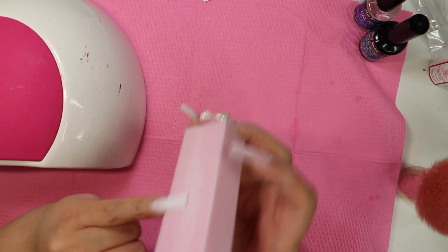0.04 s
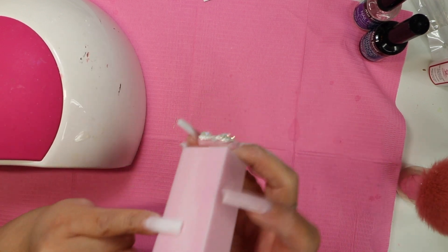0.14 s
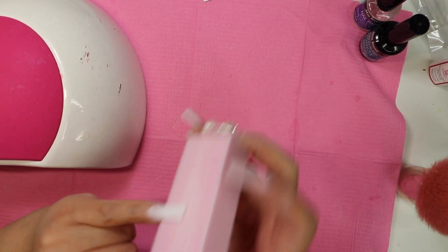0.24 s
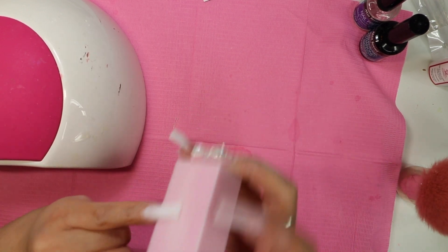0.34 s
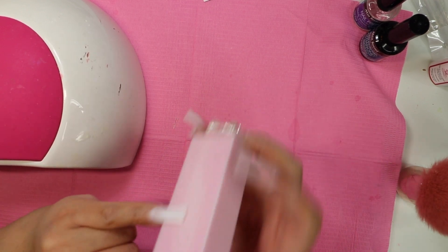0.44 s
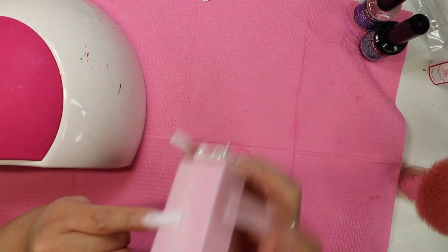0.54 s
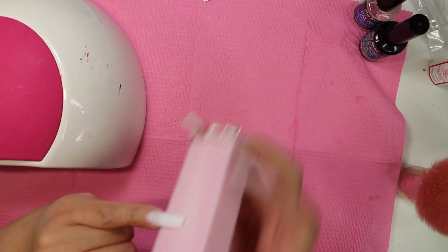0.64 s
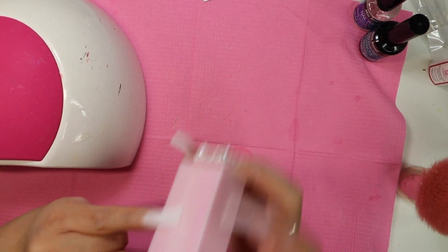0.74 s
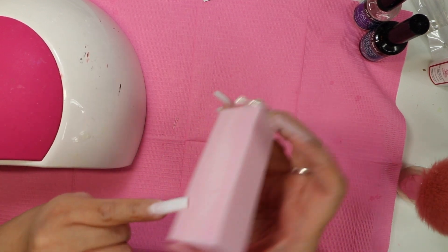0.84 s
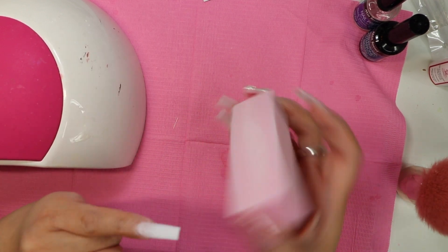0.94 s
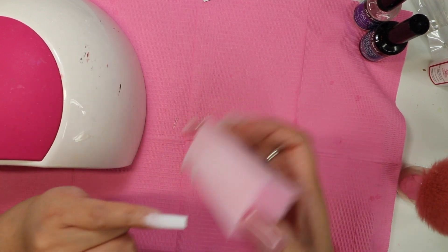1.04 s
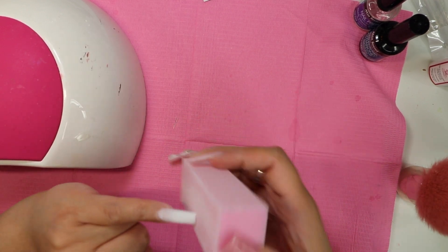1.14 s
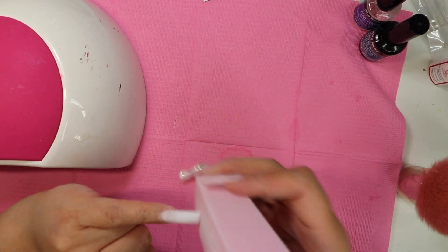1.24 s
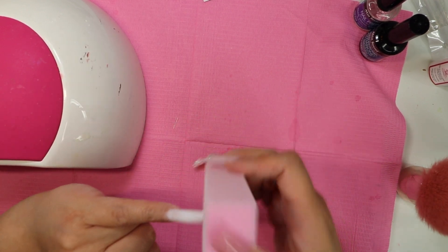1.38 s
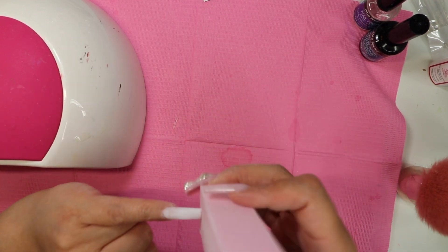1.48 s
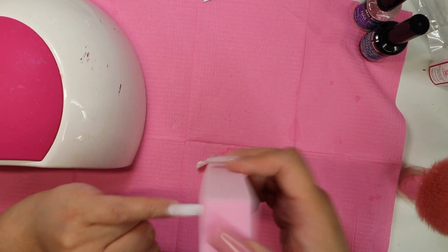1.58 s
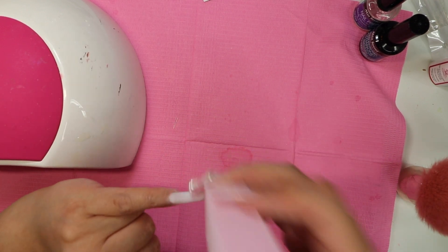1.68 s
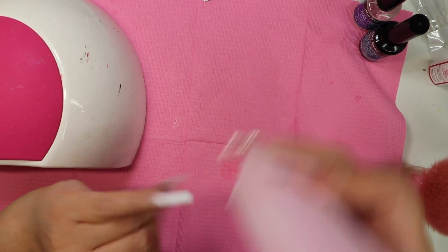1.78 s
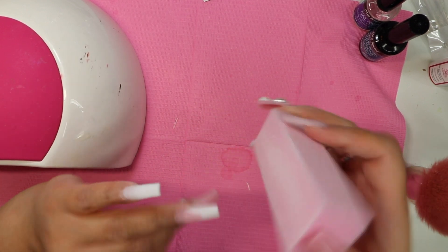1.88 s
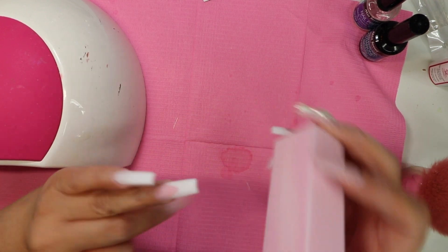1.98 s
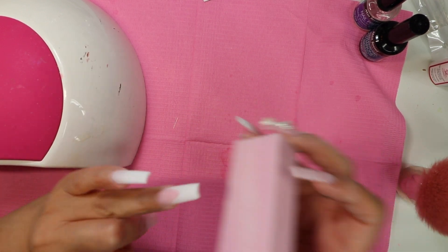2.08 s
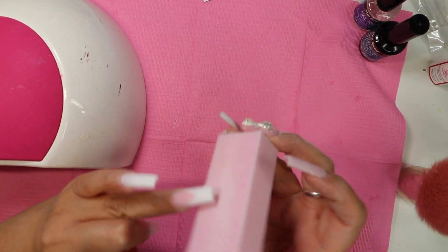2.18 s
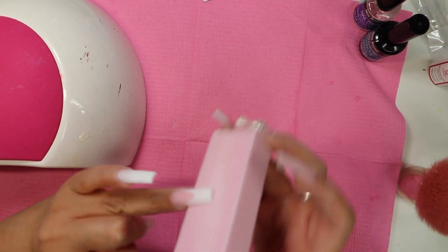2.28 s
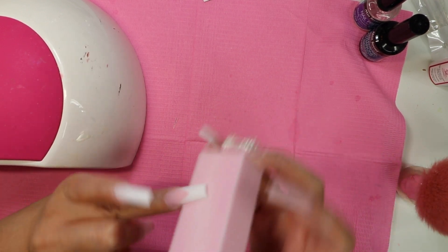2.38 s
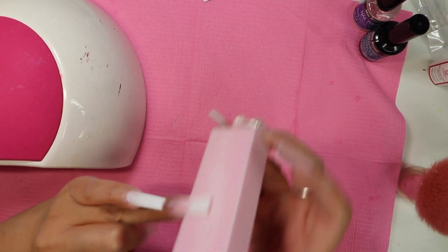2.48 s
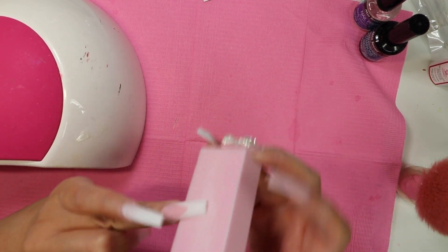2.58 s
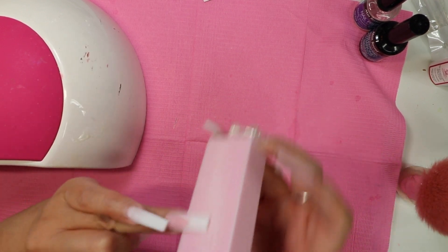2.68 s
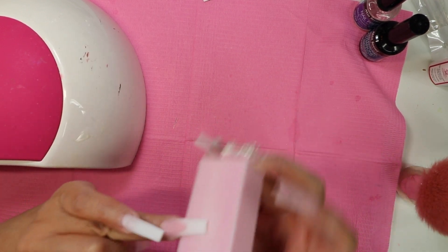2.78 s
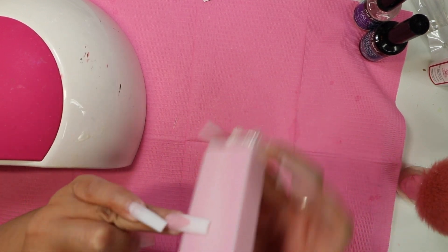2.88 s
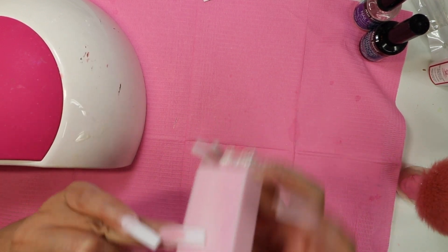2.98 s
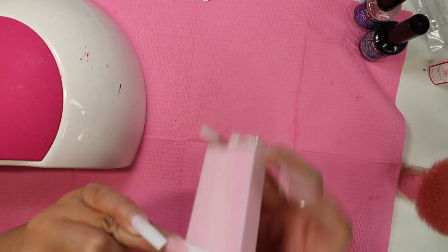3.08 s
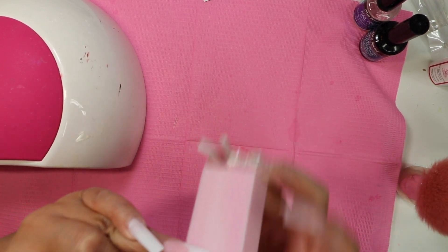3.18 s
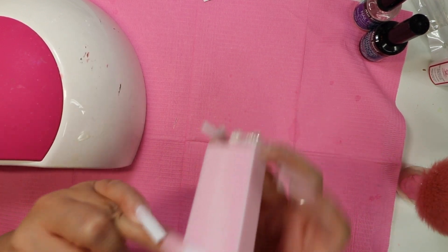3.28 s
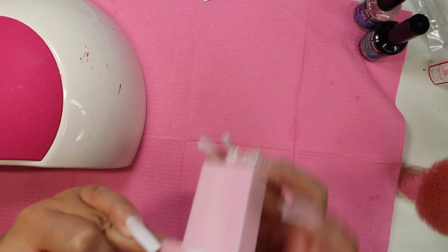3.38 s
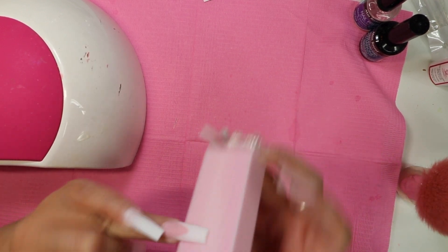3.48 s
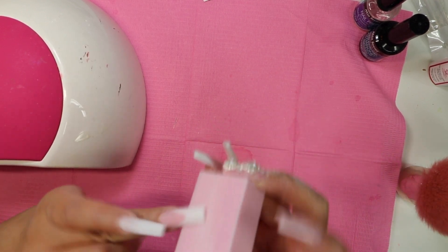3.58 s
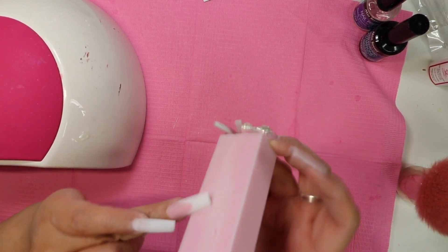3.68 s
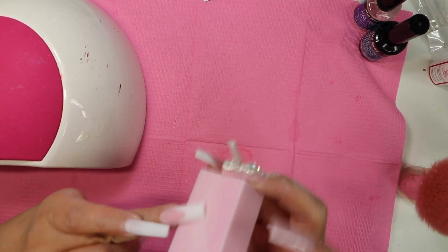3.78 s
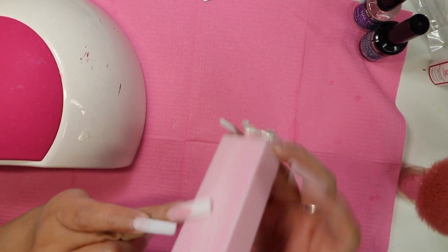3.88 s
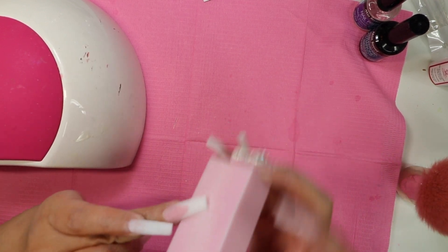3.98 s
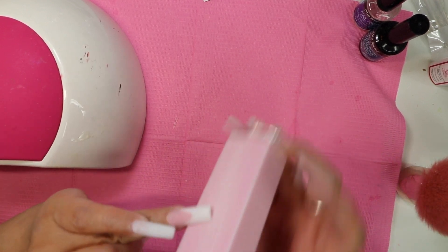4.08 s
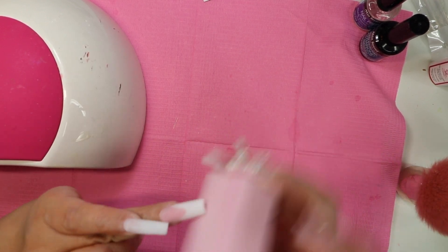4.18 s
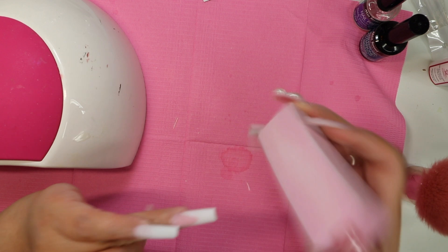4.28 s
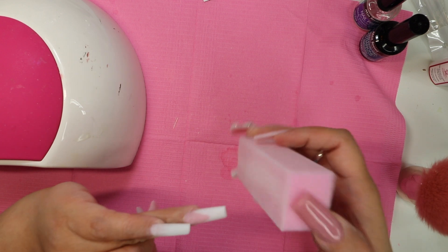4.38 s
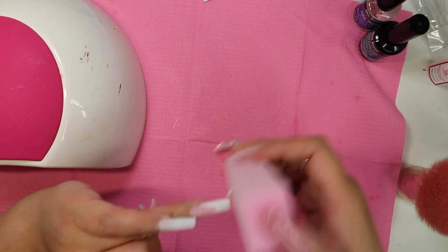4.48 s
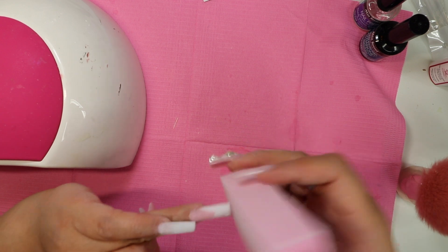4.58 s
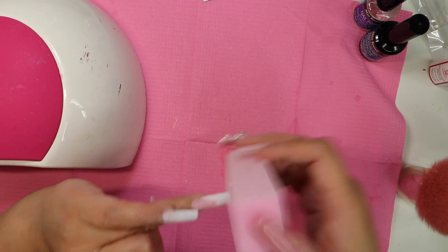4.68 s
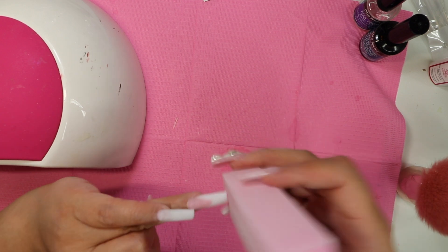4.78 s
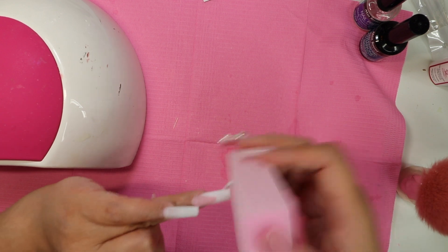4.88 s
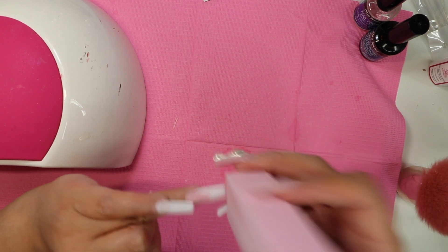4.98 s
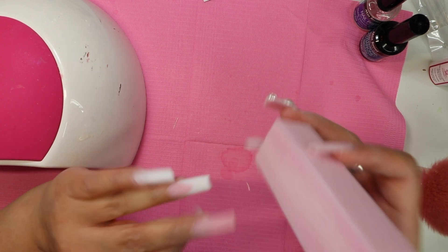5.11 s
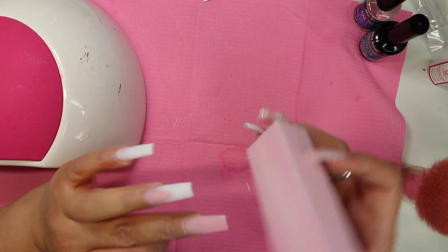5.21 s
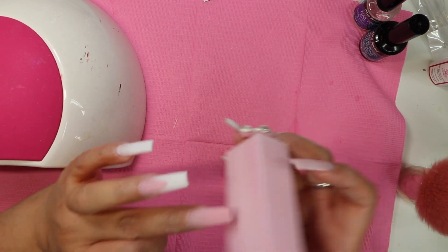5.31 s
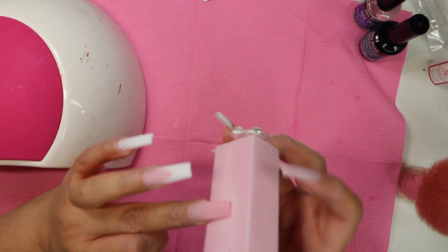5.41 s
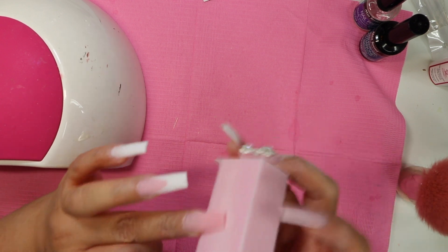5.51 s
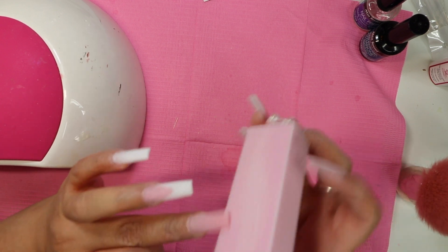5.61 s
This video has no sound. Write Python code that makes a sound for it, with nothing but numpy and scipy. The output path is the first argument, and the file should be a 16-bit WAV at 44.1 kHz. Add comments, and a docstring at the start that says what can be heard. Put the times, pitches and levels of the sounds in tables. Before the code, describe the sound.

A foam buffer block rubs back and forth over long hard fingernails in quick, gritty strokes, the nail tip clicking against it now and then. The rubbing slows to a few separate scrubs, pauses briefly, then runs quick and even again. More spaced scrubs and one last stroke follow, with light finger rustles and soft table bumps. The microphone is close, in a small room with a faint hush.

```python
"""A foam buffer block rubs long hard nails, close under a phone in a small room with a hush and faint hum.
From the start, grit catches and slips thousands of times a second, ringing nail and block; the nail tip
knocks as strokes land, with a short echo. From 0.9 s, fingers rustle and the hand jolts the table at times.
The block moves from the first nail's face to a free edge (1.1 s), to a second nail's face (1.85 s),
to an edge again (4.5 s), and ends back on the first nail's face (5.2 s)."""
import sys
import numpy as np
from scipy import signal
from scipy.fft import rfft, irfft, next_fast_len
from scipy.io import wavfile
from scipy.ndimage import uniform_filter1d

SR = 44100
rng = np.random.default_rng(int(sys.argv[2]) if len(sys.argv) > 2 else 0)


def waveform_to_disk(signal):
    """Save audio, clipped to [-1, 1], as 16-bit WAV at the path in sys.argv[1]."""
    frames = np.transpose(np.atleast_2d(signal))
    scaled = np.clip(frames, -1, 1) * 32767
    samples = np.round(scaled).astype(np.int16)
    wavfile.write(sys.argv[1], SR, samples)


N = 249165


def undb(db):
    """Turn decibels (dB) into a factor to multiply by."""
    return 10 ** (np.asarray(db) / 20)


def unit(x):
    """Scale a signal to an average power of 1."""
    return x / np.sqrt(np.mean(x ** 2) + 1e-18)


def look_up(hz, table, column=1):
    """Read between the rows of a frequency table, with octaves evenly spaced."""
    table = np.array(table)
    return np.interp(np.log(hz + 1), np.log(table[:, 0]), table[:, column])


def wander(size, rate_hz):
    """A curve that glides to a new random value rate_hz times a second."""
    step = max(int(SR / rate_hz), 2)
    held = np.repeat(rng.standard_normal(size // step + 1), step)
    return 0.94 * uniform_filter1d(held, step)[:size]


# Each row: frequency in Hz, how alike left and right are (1 = the same) for near sound, for room sound.
LIKENESS = [(60, 0.84, 0.85), (150, 0.55, 0.39), (300, 0.96, 0.48), (690, 0.95, 0.6), (1410, 0.84, 0.15),
            (2980, 0.41, 0.03), (7000, 0.32, .05), (15000, 0.34, .05)]
# Each row: frequency in Hz, how far the left wave runs ahead of the right in radians.
LEFT_LEAD = [(300, 0.13), (2200, 0.044), (3600, 0.012), (5100, 0.74), (8500, 0.61), (11000, 1.34),
             (15000, 0.81)]

def stereo(noises, hz, diffuse=False):
    """Two noises become left and right spectra: in the treble the microphones differ more."""
    mid, side = rfft(noises)
    alike = look_up(hz, LIKENESS, 2 if diffuse else 1)
    lead = np.exp(.5j * look_up(hz, LEFT_LEAD))
    mid, side = np.sqrt((1 + alike) / 2) * mid, np.sqrt((1 - alike) / 2) * side
    return np.array([(mid + side) * lead, (mid - side) / lead])


# Each row: frequency in Hz, relative strength of the hush there in dB.
HUSH_SHAPE = [(15, -40.5), (25, 1.5), (185, -9), (344, -6.5), (677, -15.5), (1400, -16), (1560, -16),
              (2220, -15), (2910, -24.5), (4740, -26), (10700, -23), (16000, -33.5)]

def hush(level_db=-52, swell_db=1.2):
    """The steady hush of the room, swelling a little."""
    hz = np.arange(N // 2 + 1) * SR / N
    spectrum = stereo(rng.standard_normal((2, N)), hz, diffuse=True)
    noise = irfft(spectrum * undb(look_up(hz, HUSH_SHAPE)), N)
    return unit(noise) * undb(level_db + swell_db * wander(N, rate_hz=4.81))


# Each row: time in seconds, level of the hum in dB.
HUM_LEVELS = [(0, -58.5), (1.1, -68), (1.3, -55.5), (1.84, -54.5), (2.0, -81), (2.4, -64.5), (4.0, -59),
              (4.46, -55), (4.75, -78), (5.2, -77), (5.65, -70)]

def hum(pitch_hz=323, width_hz=33):
    """A faint hum comes and goes: a narrow band of noise, nearly a wavering tone."""
    hz = np.arange(N // 2 + 1) * SR / N
    spectrum = stereo(rng.standard_normal((2, N)), hz)
    band = irfft(spectrum * np.exp(-((hz - pitch_hz) / width_hz) ** 2), N)
    return unit(band) * undb(np.interp(np.arange(N) / SR, *np.transpose(HUM_LEVELS)))


# Each row: start and end in seconds of a spell on a nail's free edge, its overhanging tip.
EDGE_SPELLS = [(1.1, 1.8), (4.5, 5.2)]
FIRST_FACE, EDGE, SECOND_FACE = 0, 1, 2

def place_at(seconds):
    """Where the block is rubbing at this moment."""
    if any(start < seconds < end for start, end in EDGE_SPELLS):
        return EDGE
    return SECOND_FACE if 1.85 < seconds < 4.4 else FIRST_FACE


def resonance(hz, modes, tunings):
    """How strongly and how late a thing answers each frequency. Modes are the pitches it rings at."""
    total = 0
    for k, ((pitch, width, db), tuning) in enumerate(zip(modes, tunings)):
        damping = 1j * hz * width
        total = total + (-1) ** k * undb(db) * damping / ((pitch * tuning) ** 2 - hz ** 2 + damping)
    return unit(np.abs(total)) * np.exp(1j * np.angle(total))


# The nail's ring, the foam's thud and the grit's hiss. Each row: pitch in Hz, width in Hz,
# then relative level in dB on the first nail's face, on a free edge, on the second nail's face.
NAIL_MODES = [(1058, 620, -1.5, -39, -7.5), (1264, 290, 4, -8, -1.5), (1820, 222, 5, 0, 0),
              (2327, 206, 5, -1, 1), (2714, 214, 5.5, -0.5, 1.5), (3370, 590, 5, -2, 0),
              (4260, 570, -1.5, -8.5, -3)]
BLOCK_MODES = [(196, 63, -8, -9.5, -14), (334, 95, -3, -5, -3), (509, 175, 3.5, 2, 1.5),
               (823, 300, -0.5, -4, -4)]
GRIT_BANDS = [(5400, 2050, 0.5, -3, -3), (7320, 2090, 4, 2, 1.5), (8800, 2110, 3, 0, 2.5),
              (11270, 1980, -2, -6, -2.5), (13900, 3000, -10.5, -13, -11)]

def ring(forces, place, thud_db, hiss_db, pan_db, pitch_hz, boost_db, tunings):
    """Three forces ring nail, block and grit. Nail modes near pitch_hz are boosted."""
    size = forces.shape[-1]
    hz = np.arange(size // 2 + 1) * SR / size
    nail = [(f, width, db[place] + boost_db * np.exp(-(np.log(f / pitch_hz) / 0.16) ** 2))
            for f, width, *db in NAIL_MODES]
    block = [(f, width, db[place]) for f, width, *db in BLOCK_MODES]
    grit = [(f, width, db[place]) for f, width, *db in GRIT_BANDS]
    lean = np.array([[.5], [-.5]])  # a negative pan leans to the right
    responses = (resonance(hz, nail, tunings[:7]) * undb(pan_db * lean),
                 resonance(hz, block, tunings[7:11]) * undb(thud_db),
                 resonance(hz, grit, tunings[11:]) * undb(hiss_db + (pan_db + 2.0) * lean))
    return irfft(sum(stereo(force, hz) * response for force, response in zip(forces, responses)), size)


# An ordinary stroke on the first face, a free edge and the second face.
# Each row: thud in dB and hiss in dB against the nail's ring, pan (left minus right) in dB.
BALANCE = [(-11, -4, -1.4), (-13.5, -8, -3.5), (-12.5, -3, -2)]
# Each row: start in seconds, rise in ms, rubbing time in ms, level in dB as the block bites,
# level in dB mid-stroke, favoured pitch in Hz.
STROKES = [(0.005, 26, 14.5, -21.5, -24.5, 2010), (0.111, 3, 15, -31, -37.5, 3310),
           (0.139, 3, 20, -36, -31, 2990), (0.19, 1, 126, -45.5, -52, 3130),
           (0.273, 13.4, 60.7, -26.5, -22.5, 1800), (0.394, 3.9, 41.7, -20, -20.5, 3080),
           (0.483, 0.87, 51.5, -24.5, -21.5, 1880), (0.579, 12, 39.6, -24, -23, 2800),
           (0.664, 9.7, 56.3, -21, -22.5, 1860), (0.786, 12.6, 109, -18.5, -22, 2010),
           (0.993, 23, 62, -41.5, -49.5, 2280), (1.127, 1.7, 32, -41.5, -48, 1440),
           (1.201, 2.4, 88.4, -21, -22, 2280), (1.425, 8.6, 84.7, -19.5, -21.5, 2340),
           (1.649, 1.6, 34, -26, -24, 2430), (1.893, 11, 27, -47, -51.5, 1860),
           (1.976, 6.2, 117, -50, -46, 1870), (2.308, 9.1, 50.6, -26, -28.5, 1840),
           (2.404, 7.4, 50, -25, -22, 3500), (2.525, 1.4, 55, -26.5, -31, 1930),
           (2.614, 8.4, 46, -28.5, -28, 1630), (2.714, 5.2, 51.6, -23.5, -30.5, 1730),
           (2.81, 1.9, 47, -32.5, -27.5, 2100), (2.892, 6.8, 60, -21.5, -24.5, 1940),
           (2.992, 21, 44.5, -23.5, -23, 2860), (3.094, 11.3, 53, -20, -22.5, 2070),
           (3.208, 6.8, 39, -24, -25, 1830), (3.344, 1.1, 17, -20.5, -26.5, 3700),
           (3.412, 6.4, 43, -28.5, -33, 2160), (3.482, 6.6, 98.4, -26.5, -26.5, 1990),
           (3.632, 5.5, 58, -27.5, -23.5, 2000), (3.724, 5.4, 55, -29, -27.5, 2000),
           (3.827, 9.5, 49.5, -27.5, -26, 2110), (3.922, 3.6, 52.5, -24, -30, 2000),
           (4.002, 21, 47, -26, -25.5, 2030), (4.102, 7.1, 74.4, -24.5, -27, 1960),
           (4.197, 7.5, 28.5, -30, -22.5, 1820), (4.266, 1, 52, -54, -41.5, 2420),
           (4.572, 2.3, 41.4, -24, -19.5, 2500), (4.761, 2.2, 52.7, -18, -18.5, 2820),
           (4.973, 1.24, 32.7, -14.5, -18.5, 3170), (5.15, 3.8, 21.7, -41, -31, 2900),
           (5.445, 9.4, 45, -52, -45, 1770), (5.553, 2.4, 68, -33, -24.5, 1860)]

def strokes(graze_ms=20, fall_ms=14.7, grain_db=3.6, chatter_db=2.6, surge_db=2.0, detune=.025):
    """Grit slips in countless uneven steps; the nail chatters, so the force comes in bursts."""
    size = 8192
    out = np.zeros((2, N + SR))
    all_tunings = 1 + detune * rng.standard_normal((len(STROKES), 16))
    for (start, rise_ms, rub_ms, bite_db, middle_db, pitch_hz), tunings in zip(STROKES, all_tunings):
        place = place_at(start)
        graze_db, chatter_hz = (bite_db - 30, 600) if place == EDGE else (bite_db - 20, 250)
        # Compared with an ordinary stroke (-26 dB, 48 ms), more pressure favours the nail's ring;
        # a longer stroke lays more foam on the nail: more thud, less hiss.
        pressure_db = max((bite_db + middle_db) / 2, -32.5) + 26
        extra_ms = rub_ms - 48
        thud_db, hiss_db, pan_db = BALANCE[place]
        thud_db += -0.69 * pressure_db + 0.047 * extra_ms
        hiss_db += -0.21 * pressure_db - 0.0176 * extra_ms
        # The block grazes the nail, bites, rubs, eases and lifts off.
        eased_db = middle_db - 4.5
        corners_ms = np.cumsum([0, graze_ms, rise_ms, rub_ms / 6, rub_ms / 3, rub_ms / 3, rub_ms / 6,
                                fall_ms, 5])
        corners_db = [graze_db - 8, graze_db, bite_db - 1.5, bite_db, middle_db,
                      eased_db, eased_db - 3, eased_db - 24, -120]
        level_db = np.interp(np.arange(size) * 1000 / SR, corners_ms, corners_db)
        grains = grain_db * np.minimum(rng.exponential(size=size), 4)
        chatter = chatter_db * wander(size, chatter_hz)
        slips = undb(grains + chatter + surge_db * wander(size, rate_hz=70))
        slips /= np.sqrt(uniform_filter1d(slips ** 2, 900))  # the hand's pressure evens out over 20 ms
        forces = unit(slips * rng.standard_normal((3, 2, size))) * undb(level_db)
        forces[2] *= undb(0.18 * (level_db - level_db.max()))  # slow contact is duller: less grit
        i = int(start * SR)
        out[:, i:i + size] += ring(forces, place, thud_db, hiss_db, pan_db, pitch_hz,
                                   boost_db=4.5, tunings=tunings)
    return out[:, int(graze_ms * SR / 1000):][:, :N]  # each graze comes just before its start time


# Each row: frequency in Hz, seconds the echo takes to fade by 60 dB, level in dB.
ECHO_BANDS = [(300, 0.47, -12.5), (980, 0.28, -8), (2500, 0.23, -13), (6000, 0.28, -11),
              (12000, 0.14, -10.5)]

def echo(near, onset_ms=4):
    """The room smears each sound into a short tail of fading noise, built octave by octave."""
    size = next_fast_len(N + SR)
    t = np.arange(SR) / SR
    hz = np.arange(SR // 2 + 1.)
    onset = 1 - np.exp(-t * 1000 / onset_ms)
    tail = 0
    for centre_hz in 180 * 2. ** np.arange(7):
        spectrum = stereo(rng.standard_normal((2, SR)), hz, diffuse=True)
        band = irfft(spectrum * np.exp(-(np.log2((hz + 1) / centre_hz) / 0.74) ** 2), SR)
        shape = onset * np.exp(-np.log(1000) * t / look_up(centre_hz, ECHO_BANDS))
        gain = undb(look_up(centre_hz, ECHO_BANDS, column=2))
        tail = tail + gain * band * shape / np.sqrt(np.sum(shape ** 2))
    return irfft(rfft(tail, size) * rfft(near.mean(axis=0), size), size)[:, :N]


# Each row: start in seconds, peak level in dB, favoured pitch in Hz,
# then the block's thud in dB and the grit's tick in dB against the nail's ring.
KNOCKS = [(0.0275, -13, 2360, -7, -2), (0.1406, -15, 3140, -26, -2), (0.1535, -22, 3300, -22, -2),
          (0.2949, -14, 1720, -19, 0), (0.4874, -14, 3520, -11, -6), (0.4979, -11, 3550, -26, 8),
          (0.596, -7.5, 3260, -26, -2), (0.6777, -12.5, 1820, -21, -20), (0.8518, -9, 1760, -24, -1),
          (0.9025, -14, 1730, -3.5, -9), (1.1454, -29.5, 1850, -22, -5), (1.192, -29.5, 2830, -10, -27),
          (1.3899, -29, 1640, -6, -23), (1.4365, -12.5, 2380, -30, -22), (1.6076, -35.5, 1490, 1, -21),
          (1.6545, -5.5, 2270, -31, -9), (1.8294, -43, 3530, -5, 5), (2.0296, -28.5, 1860, -2, -23),
          (2.231, -37, 1820, -8, -20), (2.3152, -9.5, 3220, -9, 8), (2.5318, -5.5, 2140, -4.5, 3),
          (2.9001, -13, 1810, -9, -14), (2.993, -20, 4170, -20, 13), (3.3136, -18.5, 1590, -15, -1.5),
          (3.329, -32, 4340, 9, -12), (3.3446, -2.5, 3790, -19, -6.5), (3.494, -10, 3800, -19, -5),
          (3.9335, -9.5, 1930, -22, 1), (4.222, -17, 1850, -4.5, -18), (4.2773, -25.5, 2050, -9, -12),
          (4.306, -32.5, 2600, -3, -15), (4.3834, -35.5, 2360, 7, 5), (4.5233, -30.5, 3420, -30, -5),
          (4.5604, -25.5, 3150, -15, -5), (4.574, -4, 3070, -14, -3), (4.590, -10, 2280, -18, -11),
          (4.715, -34.5, 1580, -5, -20), (4.9135, -24, 2620, -30, -6), (4.9591, -21.5, 2290, -11, -2),
          (5.0903, -32.5, 1770, -6, -7), (5.2896, -35, 2900, -19, -5), (5.328, -39.5, 2480, -5, -12),
          (5.3847, -37, 2800, -6, -12), (5.4585, -34.5, 2300, -7, 0), (5.474, -28.5, 1610, -12, 1),
          (5.4852, -29.5, 1780, -8, -11)]

def knocks(rattle_ms=2.87, rise_ms=0.494, blow=5, detune=0.027):
    """The nail tip hits the block: a short rattle with one sharp blow in it."""
    size = 2048
    ms = np.arange(size) * 1000 / SR
    onset = 1 - np.exp(-ms / rise_ms)
    out = np.zeros((2, N + SR))
    all_tunings = 1 + detune * rng.standard_normal((len(KNOCKS), 16))
    for (start, peak_db, pitch_hz, thud_db, tick_db), tunings in zip(KNOCKS, all_tunings):
        decay_ms = rattle_ms * undb(-0.14 * peak_db)  # light touches last longer
        forces = rng.standard_normal((3, 2, size)) * onset * np.exp(-ms / decay_ms)
        forces[:, 0] += blow * np.exp(-((ms - rise_ms) * SR / 1000) ** 2)
        knock = ring(forces, place_at(start), thud_db, tick_db, pan_db=-3.5, pitch_hz=pitch_hz,
                     boost_db=8.5, tunings=tunings)
        i = int(start * SR)
        out[:, i:i + size] += knock * undb(peak_db) / np.abs(knock.mean(axis=0)).max()
    return out[:, :N]


# One list for each shift of the fingers. Each row: time in seconds, level in dB.
RUSTLES = [
    [(0.9, -64), (0.966, -55), (1.2, -62)],
    [(1.7, -46), (1.734, -69), (2.084, -62), (2.31, -70)],
    [(4.26, -53), (4.33, -57), (4.57, -62)],
    [(5.05, -55), (5.284, -58.5), (5.398, -62), (5.56, -63)],
]

def finger_rustle(crackle_db=4.5):
    """Skin rubs lightly on the foam, ringing the same nail, block and grit."""
    size = 32768
    out = np.zeros((2, N + SR))
    for rows in RUSTLES:
        times, levels_db = np.transpose(rows)
        start = times[0]
        level_db = np.interp(start + np.arange(size) / SR, times, levels_db, right=-120)
        level_db += crackle_db * wander(size, rate_hz=120)
        forces = rng.standard_normal((3, 2, size)) * undb(level_db)
        i = int(start * SR)
        out[:, i:i + size] += ring(forces, place_at(start), thud_db=-17, hiss_db=-6, pan_db=-2.2,
                                   pitch_hz=2950, boost_db=4.3, tunings=np.ones(16))
    return out[:, :N]


# Each row: start in seconds, strength of the jolt in dB.
JOLTS = [(0.913, -49), (1.482, -50.5), (1.651, -50), (2.292, -60), (3.218, -45), (3.341, -44), (3.898, -52),
         (4.147, -50), (4.585, -41), (4.957, -48)]

def table_thumps(pitch_hz=101.3, fade_s=0.42, rise_ms=12):
    """The hand softly jolts the table top, which rings at its lowest pitch."""
    t = np.arange(N) / SR
    out = 0
    for start, strength_db in JOLTS:
        age = np.maximum(t - start, 0)
        onset = 1 - np.exp(-age * 1000 / rise_ms)
        fade = np.exp(-np.log(1000) * age / fade_s)  # 60 dB down after fade_s
        out = out + undb(strength_db) * onset * fade * np.sin(2 * np.pi * pitch_hz * age)
    return out


def scene():
    """The hands close by, their echo, the table, the hush and a faint hum."""
    near = strokes() + knocks() + finger_rustle()
    return near + echo(near) + table_thumps() + hush() + hum()


def record(dry):
    """The phone drops the deepest bass, clips any very loud peak and cuts the highest treble."""
    bass_cut = signal.butter(2, 35, "highpass", fs=SR, output="sos")
    treble_cut = signal.ellip(12, .2, 90, 15720, fs=SR, output="sos")
    clipped = np.clip(signal.sosfilt(bass_cut, dry), -.85, .85)
    return signal.sosfilt(treble_cut, clipped)


dry = scene()
out = record(dry)
waveform_to_disk(out)
```